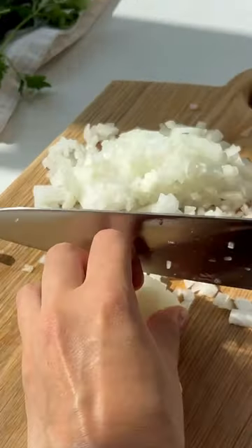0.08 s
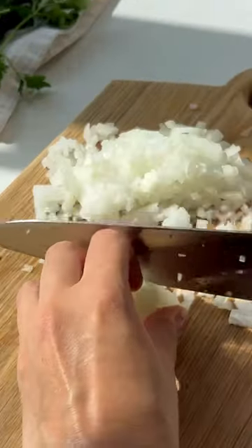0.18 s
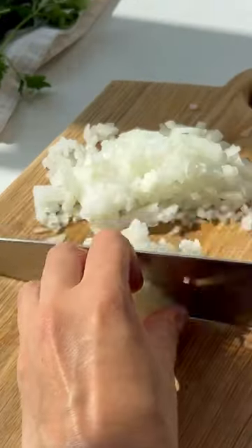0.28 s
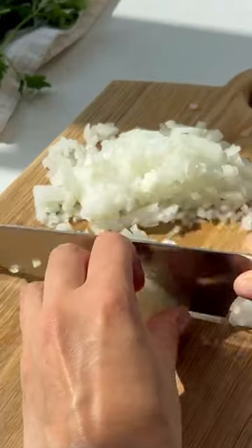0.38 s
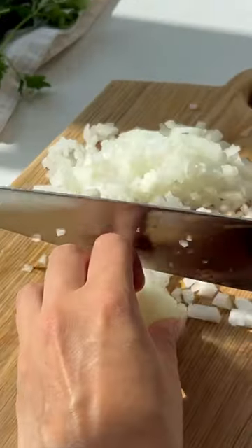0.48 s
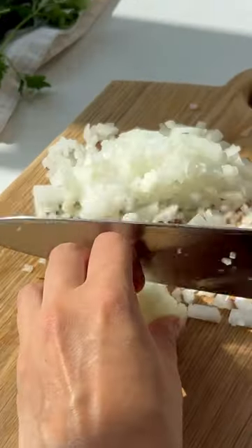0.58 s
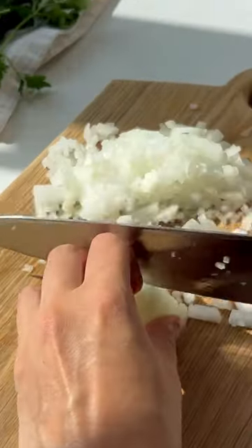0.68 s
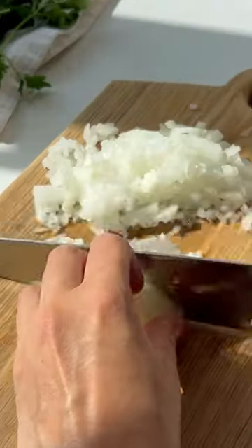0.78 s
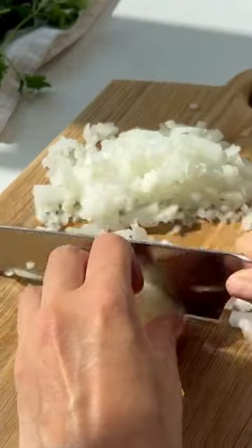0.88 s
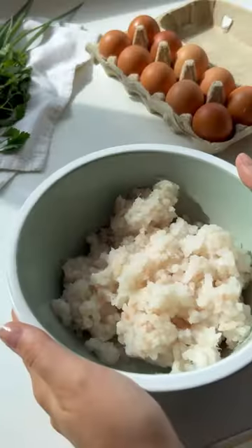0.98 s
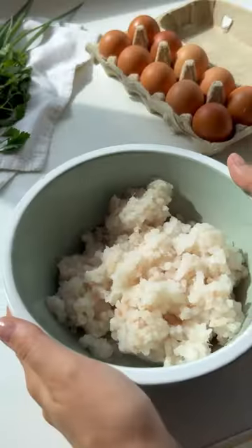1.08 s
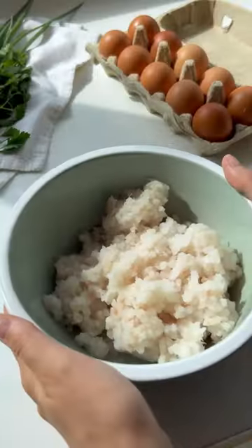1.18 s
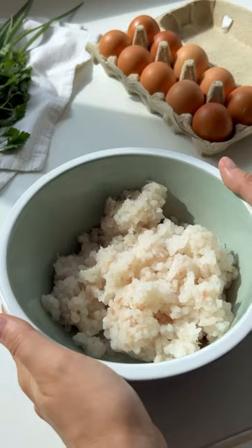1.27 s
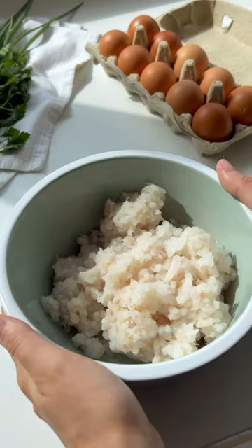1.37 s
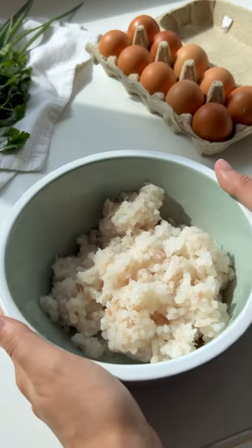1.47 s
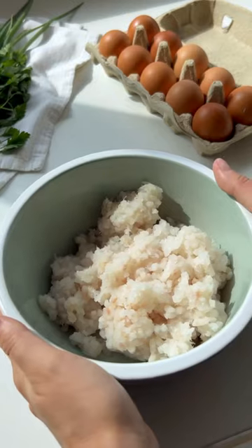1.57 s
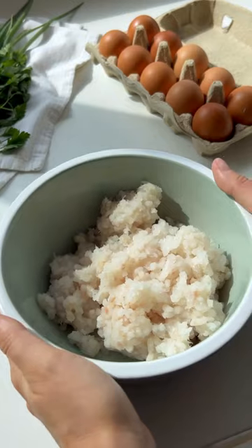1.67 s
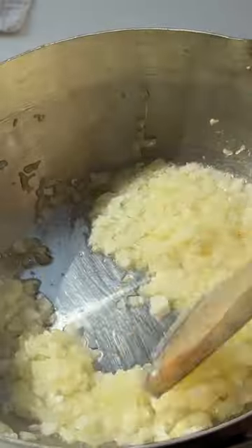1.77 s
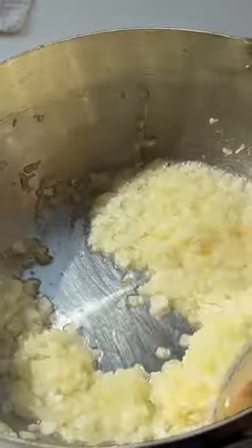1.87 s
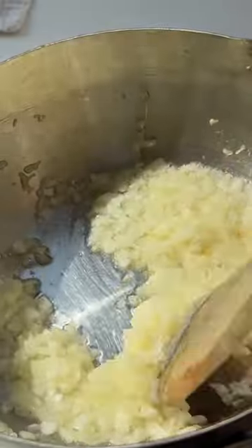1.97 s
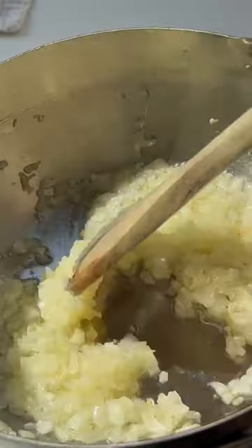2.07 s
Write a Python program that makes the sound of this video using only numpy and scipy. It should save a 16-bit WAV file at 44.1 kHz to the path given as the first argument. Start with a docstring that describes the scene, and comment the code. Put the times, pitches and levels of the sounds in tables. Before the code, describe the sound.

Onion chopped twice on wood, followed by a bowl set down and a frying pan knocked.

```python
"""A small, live kitchen, heard in short scenes over a low room hum. After a moment of sizzle, a knife
crunches twice through an onion, rupturing its fibres, and knocks on a wooden board. A filled bowl is
set down on the counter. Then onion sizzles as steam bubbles burst in oil, and a wooden spoon knocks
the steel pan. Each struck body rings in its damped normal modes, and the room reverberates."""
import sys
import numpy as np
from scipy import signal
from scipy.fft import rfft, irfft
from scipy.io import wavfile
from scipy.ndimage import uniform_filter1d

SR = 44100
rng = np.random.default_rng(int(sys.argv[2]) if len(sys.argv) > 2 else 0)


def inscribe(sig):
    """Save sig as 16-bit PCM at rate SR to the path in sys.argv[1].

    A 1-D sig is mono; a 2-D sig holds one channel per row.
    Samples are clipped to [-1, 1] before scaling.
    """
    pcm = np.round(np.clip(np.atleast_2d(sig).T, -1, 1) * 32767)
    wavfile.write(sys.argv[1], SR, pcm.astype(np.int16))


N = 94815


def undb(db):
    """Amplitude ratio of a level in decibels."""
    return 10 ** (np.asarray(db) / 20)

def clock():
    """Sample times in seconds."""
    return np.arange(N) / SR

def delay(x, seconds):
    """Pure time delay."""
    return np.pad(x, ((0, 0), (max(int(round(seconds * SR)), 0), 0)))[:, :N]

def burst(start, hold, release):
    """Envelope with a sudden onset, a hold and exponential decay."""
    t = clock() - start
    return (t >= 0) * np.exp(-np.maximum(t - hold, 0) / release)

def strokes(rows, release_s):
    """Incoherent addition: overlapping envelopes sum in power."""
    return np.sqrt(sum((undb(db) * burst(t, hold, release_s)) ** 2 for t, hold, db in rows))

def response(points):
    """Magnitude response, interpolated in level against log frequency."""
    hz, db = np.array(points, float).T
    grid_hz = np.fft.rfftfreq(2 * N, 1 / SR)
    return undb(np.interp(np.log(grid_hz + 1), np.log(hz), db))

def colour(x, points):
    """Minimum-phase filter giving unit white noise the stated spectrum level (dB in a 1 Hz band)."""
    cepstrum = irfft(np.log(response(points)))
    cepstrum[1:N] *= 2
    cepstrum[N + 1:] = 0
    return irfft(rfft(x, 2 * N) * np.exp(rfft(cepstrum)))[..., :N] * np.sqrt(SR / 2)

def band(x, hz, width_hz):
    """Second-order resonator with unit gain at its centre."""
    return signal.lfilter(*signal.iirpeak(hz, hz / width_hz, fs=SR), x)

def lean_right(x):
    """Level difference between channels: around 1.1 kHz the direct sounds are louder on the right."""
    return x + np.array([[-.33], [.33]]) * band(x.mean(axis=0), hz=1150, width_hz=450)

# Width of the diffuse field: f/Hz, side level re mid/dB
DIFFUSE_WIDTH = [(170, -41.5), (350, -11.5), (1100, 5.5), (2200, -18), (4000, -11.5), (7000, 10)]
def spread(pair, width_db=0):
    """Partial coherence: two independent signals mix as mid and side; the bass stays central."""
    mid, side = rfft(pair, 2 * N)
    width = np.minimum(response(DIFFUSE_WIDTH) * undb(width_db), 1)
    left_right = np.array([mid + width * side, mid - width * side])
    return irfft(left_right / np.sqrt(1 + width ** 2))[:, :N]

def noise():
    """Diffuse Gaussian noise in stereo."""
    return spread(rng.standard_normal((2, N)))

def crackle(per_s, spread_db, width_db):
    """Shot noise: a Poisson train of impulses of random sign and size."""
    clicks = (rng.random((2, N)) < per_s / SR) * np.sign(rng.standard_normal((2, N)))
    clicks *= undb(spread_db * np.minimum(rng.exponential(size=(2, N)), 4))
    return spread(clicks / clicks.std(), width_db)

def decay(t60):
    """Exponential damping by 60 dB in t60 seconds."""
    return np.exp(-np.log(1000) * clock() / t60)

def ring(modes, rise_s):
    """Modal superposition: damped sinusoids build up as the contact pushes the body."""
    vibration = sum(undb(db) * np.sin(2 * np.pi * hz * clock()) * decay(t60) for hz, db, t60 in modes)
    return vibration[None] * (1 - np.exp(-clock() / rise_s))

def contact(spectrum, decay_s):
    """Impact transient: a brief noise burst as two surfaces meet."""
    return colour(noise() * burst(0, 0, decay_s), spectrum)

def reverb(crossover_hz=1500, build_s=.002):
    """Reverberation: a diffuse field builds up, then dies sooner in the treble."""
    field = noise()
    low = signal.sosfilt(signal.butter(2, crossover_hz, fs=SR, output="sos"), field)
    high = signal.sosfilt(signal.butter(2, crossover_hz, "high", fs=SR, output="sos"), field)
    return (low * decay(t60=.69) - high * decay(t60=.34)) * (1 - np.exp(-clock() / build_s))

def in_room(x, wet_db):
    """Direct sound plus its convolution with the room's impulse response."""
    room = reverb()
    room /= np.sqrt(np.sum(room ** 2) / 2)
    return x + undb(wet_db) * signal.fftconvolve(x[:1], room, axes=1)[:, :N]

# Frying: f/Hz, spectrum level/dB
SIZZLE_SPECTRUM = [(200, -87), (700, -85), (2000, -88.5), (5000, -90), (8500, -84), (12000, -90.5)]
def sizzle():
    """Shot noise from countless tiny steam bubbles bursting in oil."""
    return colour(crackle(per_s=9000, spread_db=1.5, width_db=3), SIZZLE_SPECTRUM)

# Room background: f/Hz, spectrum level/dB
HUM_SPECTRUM = [(20, -91.5), (80, -84.5), (99, -70), (120, -84), (240, -72.5), (310, -83.5), (1900, -109),
                (7500, -109), (12000, -126)]
def room_hum():
    """Stationary noise whose low spectral peaks are heard as a hum."""
    return colour(noise(), HUM_SPECTRUM)

# Blade passing through onion: t/s, duration/s, level/dB
SLICE_STROKES = [(0.106, 0.019, -8), (0.19, 0.029, -2.5), (0.222, 0.046, 1.5), (0.662, 0.058, -13),
                 (0.702, 0.074, -1)]
# Bursting fibres: f/Hz, spectrum level/dB
FIBRE_SPECTRUM = [(200, -72.5), (450, -72.5), (3200, -80), (9000, -80), (12000, -88)]
# Resonances of blade and board: f/Hz, bandwidth/Hz, spectrum level/dB
CRUNCH_RESONANCES = [(694, 50, -61), (1182, 45, -56.5), (1605, 230, -66.5), (2650, 73, -68.5)]
# Single layers snapping: t/s, level/dB, f/Hz
LAYER_SNAPS = [(.1205, -27, 6240), (.207, -25, 4600), (.2385, -36, 9000), (.5952, -30.5, 6700),
               (.669, -26, 8600), (.7062, -22.5, 6800), (.7482, -20.5, 4570)]
def onion_crunch():
    """Fracture: bursting fibres excite blade and board, and whole layers snap."""
    fibres = crackle(per_s=1200, spread_db=2.5, width_db=-13) * strokes(SLICE_STROKES, release_s=.0055)
    body = np.sqrt(SR / 2) * sum(undb(db) * band(fibres, hz, bw) for hz, bw, db in CRUNCH_RESONANCES)
    snaps = sum(undb(db) * band(noise() * burst(t, 0, .00085), hz, .8 * hz) for t, db, hz in LAYER_SNAPS)
    return lean_right(in_room(colour(fibres, FIBRE_SPECTRUM) + body + snaps, wet_db=-4.5))

# Blade set on the onion: t/s, knock level/dB, ring level/dB
BLADE_TOUCHES = [(.1125, -9.5, -7), (.121, -6.5, -5), (.596, 0, -13.5)]
# Its soft knock: f/Hz, spectrum level/dB
TOUCH_SPECTRUM = [(380, -75), (780, -58), (1400, -84)]
# Its faint ring: f/Hz, level/dB, T60/s
TOUCH_MODES = [(133.7, -36.5, 0.53), (725.4, -35.5, 0.2), (1167, -38, .12)]
def blade_touches():
    """Soft impact: the blade settles on the onion with a knock and a faint ring."""
    modes = ring(TOUCH_MODES, rise_s=.0033)
    return lean_right(sum(
        delay(undb(knock_db) * contact(TOUCH_SPECTRUM, decay_s=.0086) + undb(ring_db) * modes, t)
        for t, knock_db, ring_db in BLADE_TOUCHES))

# Hand loading the board: t/s, duration/s, level/dB
HAND_PRESSES = [(.115, .022, -7.5), (.205, .079, -2), (.603, .05, -6.5), (.715, .055, 3.5)]
# Loaded board: f/Hz, spectrum level/dB
PRESS_SPECTRUM = [(45, -55.5), (100, -59.5), (180, -58), (400, -100)]
def hand_presses():
    """Forced vibration: the board rumbles under the hand's load."""
    return colour(noise() * strokes(HAND_PRESSES, release_s=.033), PRESS_SPECTRUM)

# Blade meeting the board: t/s, level/dB
BOARD_KNOCKS = [(0.2679, -2), (0.7794, -3)]
# Wooden board: f/Hz, level/dB, T60/s
BOARD_MODES = [(142.6, -32.5, 0.75), (177.2, -28.5, .39), (371, -27, 0.34), (569.6, -25, .21),
               (677, -17.5, .13), (909, -27.5, .19), (1037, -2.5, 0.019), (1094, -18.5, .17),
               (1193, -7, 0.0878), (1217, -25.5, .25), (1546, -29, 0.44), (1608, -21, .16),
               (1650, -10, 0.013), (2556, -10, 0.017)]
# Reverberation of a chop: f/Hz, spectrum level/dB
BOARD_REVERB = [(80, -68.5), (190, -46.5), (300, -59), (470, -60), (1200, -52), (1430, -58), (1750, -55),
                (2100, -64), (2600, -65.5), (3600, -81.5), (12000, -107)]
def board_knocks():
    """Impulse excitation: the blade breaks through and sets the board's modes ringing."""
    board = lean_right(ring(BOARD_MODES, rise_s=.00049))
    return sum(undb(db) * delay(board + colour(reverb(), BOARD_REVERB), t) for t, db in BOARD_KNOCKS)

def bowl_scuff(hz=1050):
    """Friction noise: the bowl's foot brushes the counter just before landing."""
    friction = noise() * burst(start=1.393, hold=.0089, release=.0059)
    return undb(-26.5) * band(band(friction, hz, hz / 2), hz, hz)

# Bowl landing, then rocking flat: t/s, level/dB
BOWL_IMPACTS = [(1.4019, 1), (1.4392, -14)]
# Bowl on the counter: f/Hz, level/dB, T60/s
BOWL_MODES = [(172.8, -29, 0.39), (264.7, -19, 0.2), (374, -17.5, 0.14), (400, -24.5, 0.26),
              (470.5, -25, 0.34), (705.6, -27, .11)]
# Tick of its foot: f/Hz, spectrum level/dB
FOOT_SPECTRUM = [(60, -74), (600, -48), (1500, -64), (2700, -65), (3800, -80), (10000, -103)]
# Reverberation of the bowl: f/Hz, spectrum level/dB
BOWL_REVERB = [(50, -72), (240, -50), (500, -59), (1200, -69.5), (1800, -79.5), (2700, -80.5), (4000, -101),
               (11000, -132)]
def bowl_landing(left_lag_s=.00007):
    """Free vibration of the filled bowl, a hollow thud; time and level differences place it right."""
    body = lean_right(ring(BOWL_MODES, rise_s=.0007) + contact(FOOT_SPECTRUM, decay_s=.0059))
    body = np.vstack([delay(body[:1], left_lag_s), body[1:]])
    return sum(undb(db) * delay(body + colour(reverb(), BOWL_REVERB), t) for t, db in BOWL_IMPACTS)

# Spoon against the pan: t/s, level/dB, contact time/s
SPOON_IMPACTS = [(1.8448, 0.5, 0.000023), (1.8499, -13, 0.000011), (1.9551, -0.5, .00019)]
# Steel pan: f/Hz, level/dB, T60/s
PAN_MODES = [(538, -39, 0.31), (767, -27, 0.083), (1024, -36.5, .22), (1550, -31, 0.24),
             (1610, -14.5, 0.023), (2202, -34, 0.33), (2670, -18.5, 0.024), (2935, -35, 0.29),
             (3396, -39.5, 0.11), (4400, -38.5, 0.19), (5450, -35.5, 0.047)]
# Clack of wood on steel: f/Hz, spectrum level/dB
CLACK_SPECTRUM = [(300, -66), (800, -43.5), (1200, -56), (2850, -55), (3300, -75), (4700, -66),
                  (6500, -102)]
# Reverberation of the pan: f/Hz, spectrum level/dB
PAN_REVERB = [(50, -82), (230, -58.5), (430, -77.5), (900, -66.5), (1300, -75), (2700, -72.5), (3300, -100)]
def spoon_knocks(split=.0102, twin_db=-7.5):
    """The struck pan's split mode pairs beat; a longer contact low-passes the knock more."""
    twins = [(hz * (1 - split), db + twin_db, t60) for hz, db, t60 in PAN_MODES]
    steel = in_room(ring(PAN_MODES, rise_s=.0016) + ring(twins, rise_s=.02), wet_db=-15)
    knocks = np.zeros((2, N))
    for t, db, contact_s in SPOON_IMPACTS:
        hit = lean_right(steel + contact(CLACK_SPECTRUM, decay_s=.0044)) + colour(reverb(), PAN_REVERB)
        pole = np.exp(-1 / (contact_s * SR))
        dulled = signal.lfilter([(1 - pole) ** 2], [1, -2 * pole, pole ** 2], hit)
        knocks += undb(db) * delay(dulled, t)
    return knocks

# Spoon shoving the pan: t/s, level/dB
PAN_SHOVES = [(1.933, 2), (1.957, -28)]
# Pan and hob together: f/Hz, level/dB, T60/s
HOB_MODES = [(75.7, -38.5, 0.37), (237, -35.5, 0.65)]
def pan_shoves():
    """Free vibration: pan and hob ring low after each shove."""
    hob = ring(HOB_MODES, rise_s=.003)
    return sum(undb(db) * delay(hob, t) for t, db in PAN_SHOVES)

def gate(start, end):
    """Rectangular time window with short ramps."""
    return uniform_filter1d(1. * ((clock() >= start) & (clock() < end)), size=128)

def scene(knife_s=.085, bowl_s=.931, pan_s=1.725):
    """Superposition: sizzle, knife, bowl and pan take turns over the steady hum."""
    frying = sizzle()
    cutting = onion_crunch() + blade_touches() + hand_presses() + board_knocks()
    fade_in = 1 - burst(pan_s, 0, release=.014)
    return (gate(0, knife_s) * undb(-2) * frying
            + gate(knife_s, bowl_s) * cutting
            + gate(bowl_s, pan_s) * (bowl_scuff() + bowl_landing())
            + gate(pan_s, N / SR) * (fade_in * frying + spoon_knocks() + pan_shoves())
            + room_hum())

def record(dry, low_hz=35, top_hz=11750):
    """Band limiting: steep filters remove the deepest bass and the highest treble."""
    thinned = signal.sosfilt(signal.butter(8, low_hz, "high", fs=SR, output="sos"), dry)
    return signal.sosfilt(signal.ellip(10, .2, 70, top_hz, fs=SR, output="sos"), thinned)


dry = scene()
out = record(dry)
inscribe(out)
```